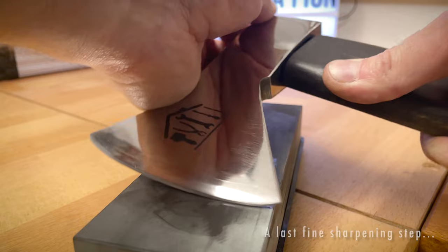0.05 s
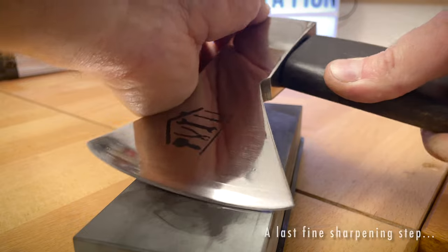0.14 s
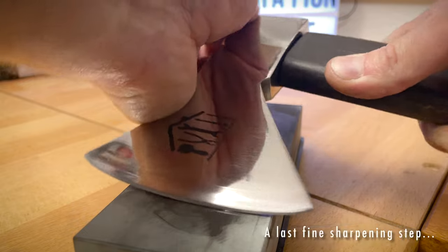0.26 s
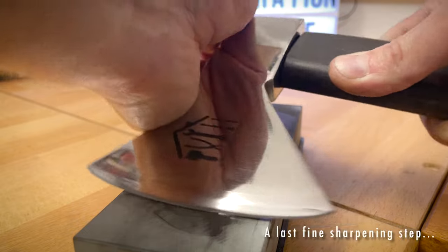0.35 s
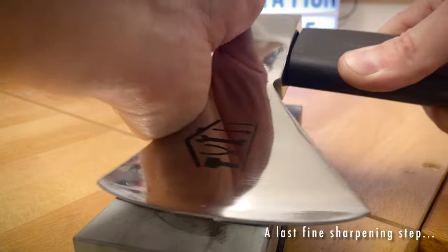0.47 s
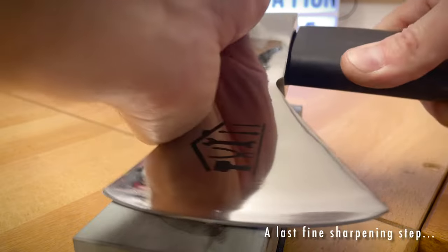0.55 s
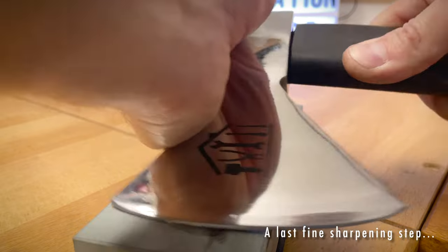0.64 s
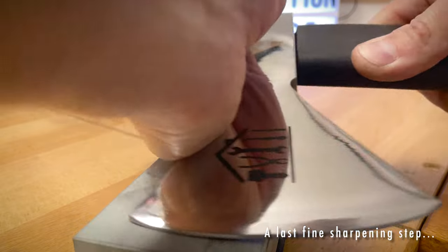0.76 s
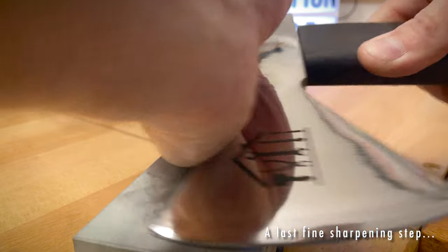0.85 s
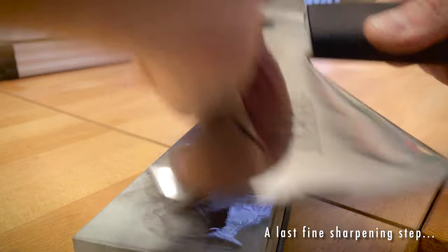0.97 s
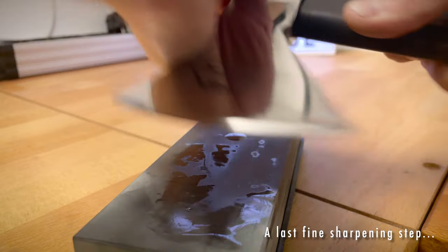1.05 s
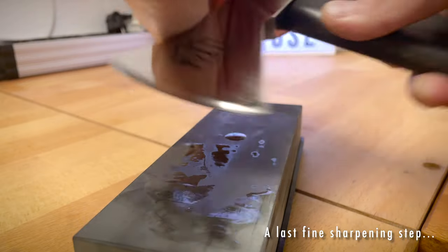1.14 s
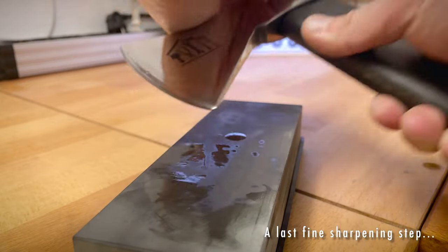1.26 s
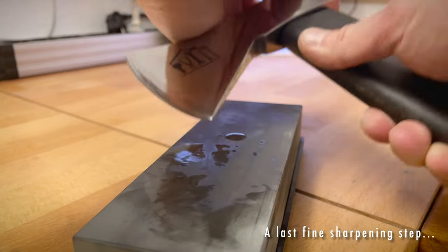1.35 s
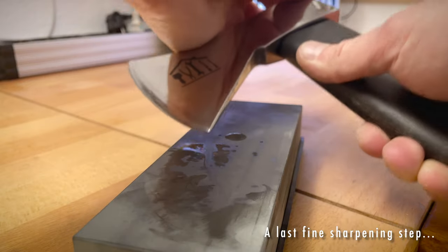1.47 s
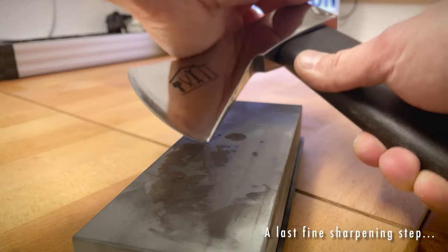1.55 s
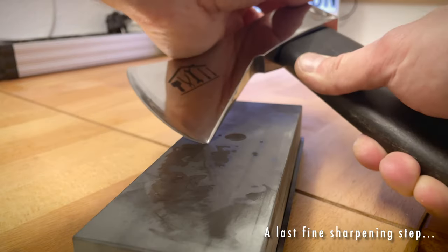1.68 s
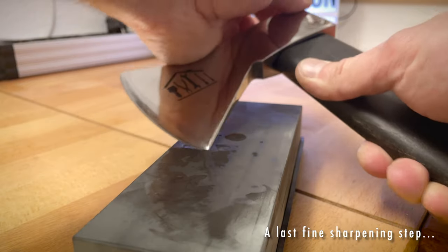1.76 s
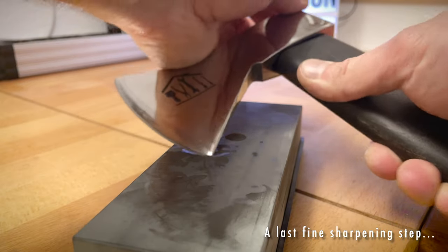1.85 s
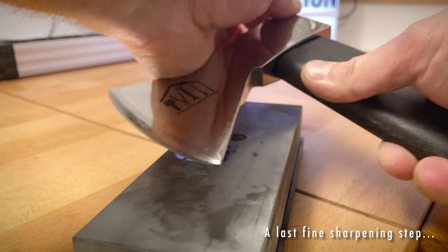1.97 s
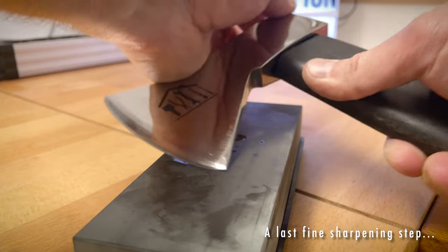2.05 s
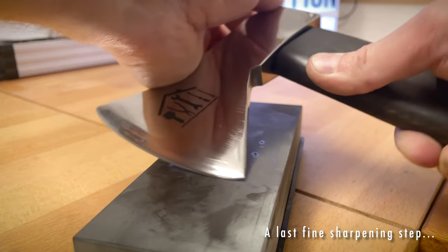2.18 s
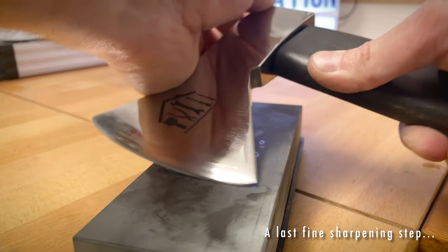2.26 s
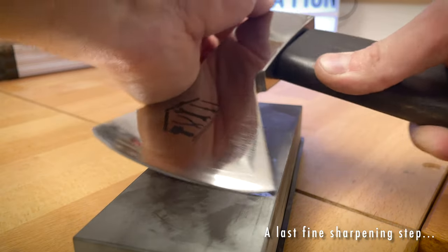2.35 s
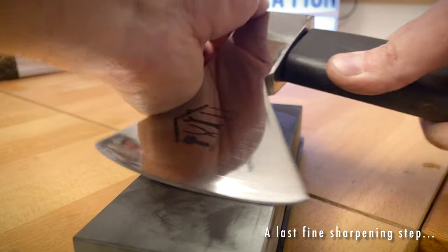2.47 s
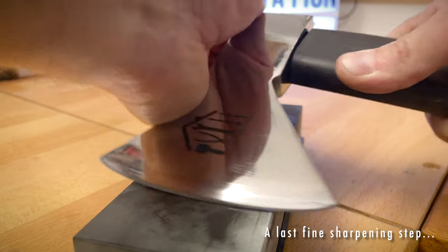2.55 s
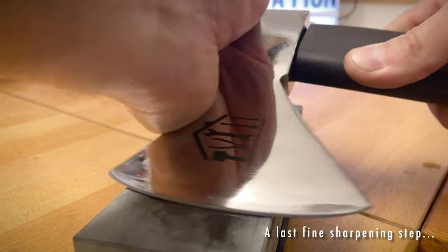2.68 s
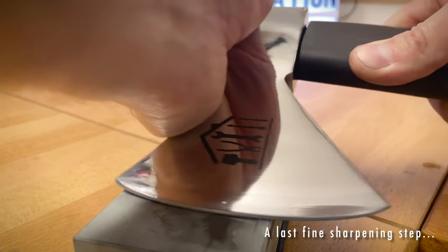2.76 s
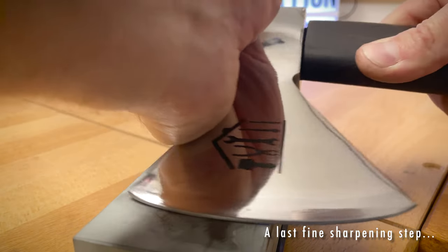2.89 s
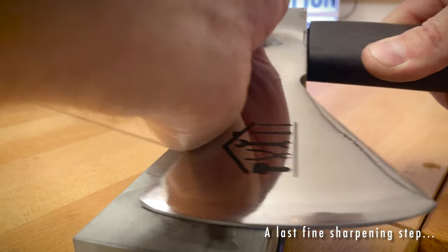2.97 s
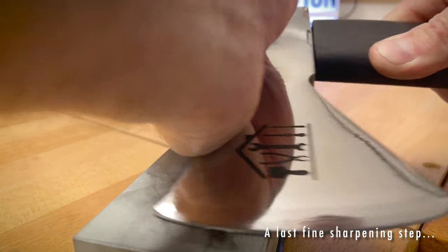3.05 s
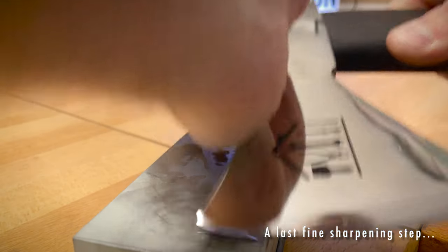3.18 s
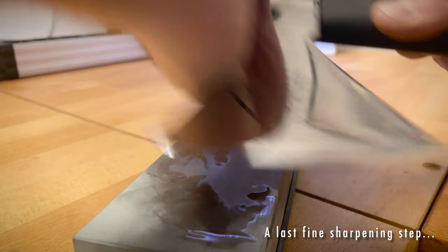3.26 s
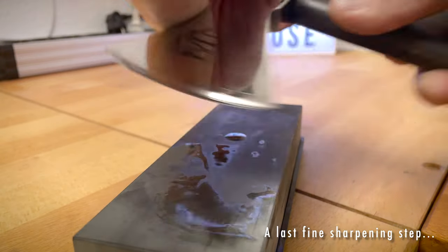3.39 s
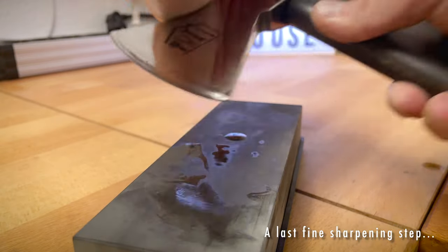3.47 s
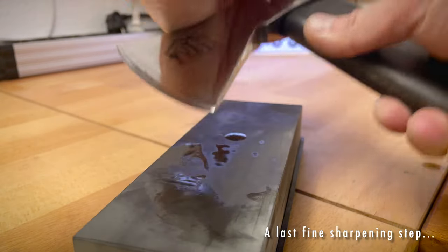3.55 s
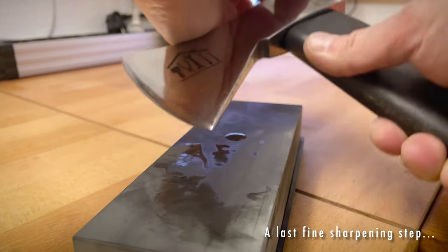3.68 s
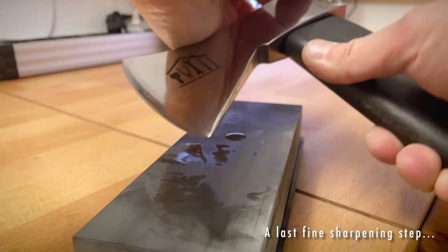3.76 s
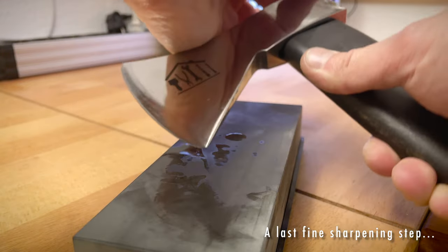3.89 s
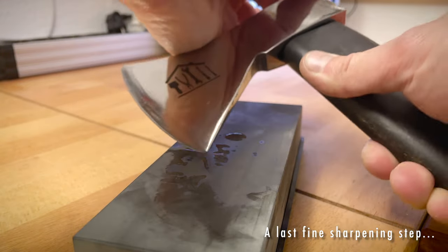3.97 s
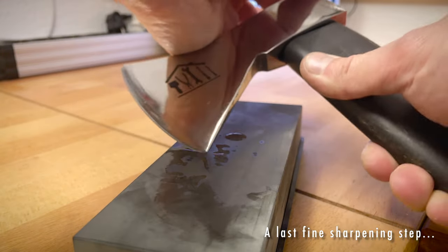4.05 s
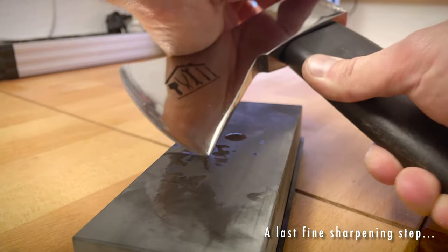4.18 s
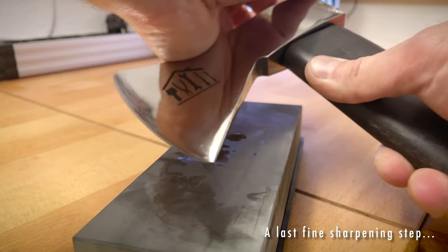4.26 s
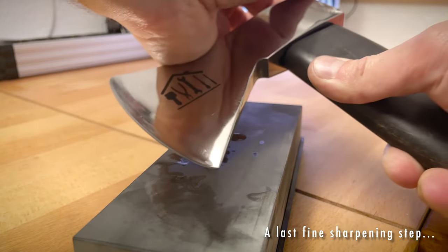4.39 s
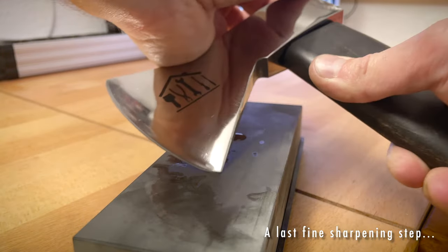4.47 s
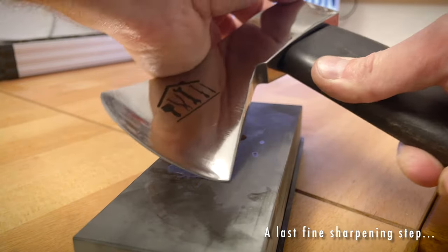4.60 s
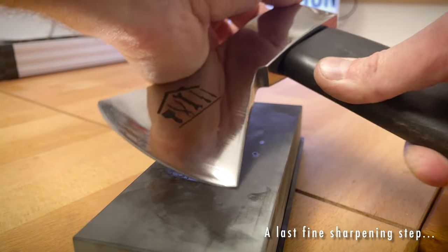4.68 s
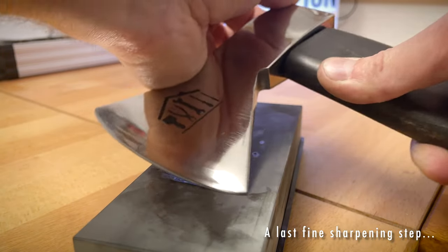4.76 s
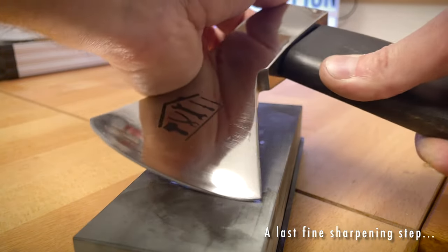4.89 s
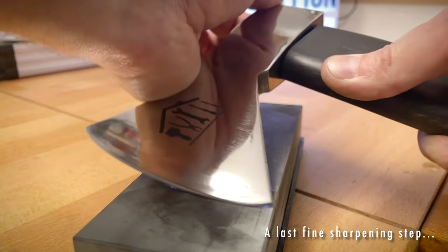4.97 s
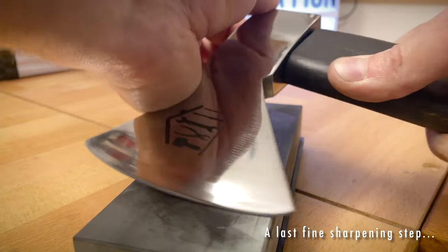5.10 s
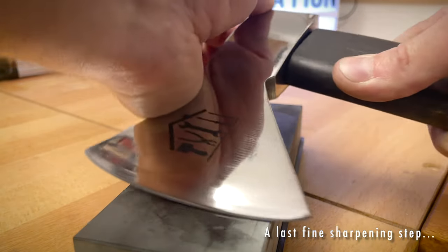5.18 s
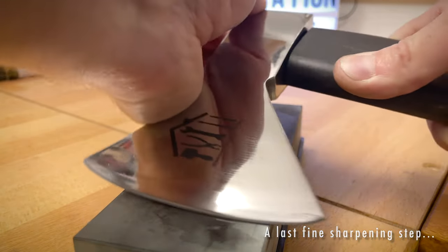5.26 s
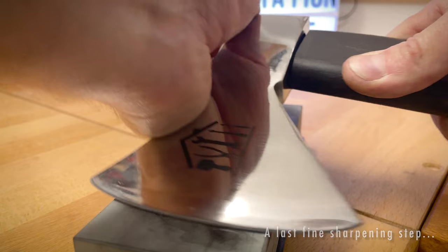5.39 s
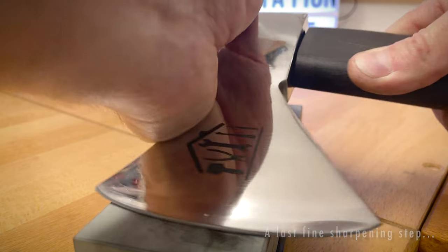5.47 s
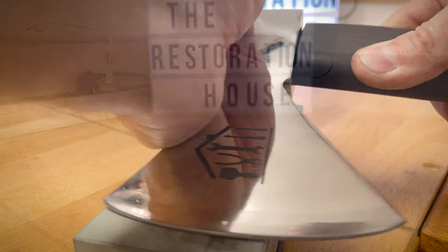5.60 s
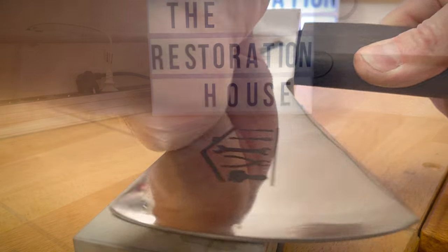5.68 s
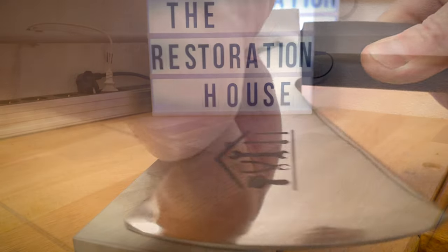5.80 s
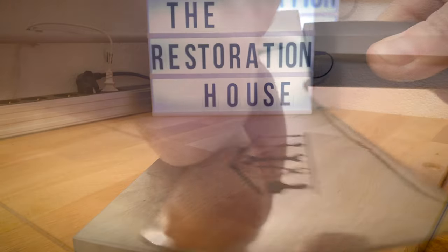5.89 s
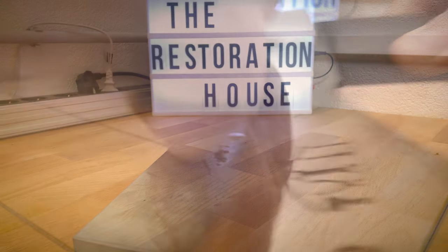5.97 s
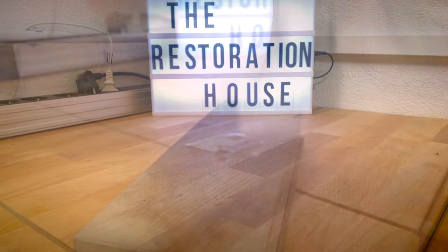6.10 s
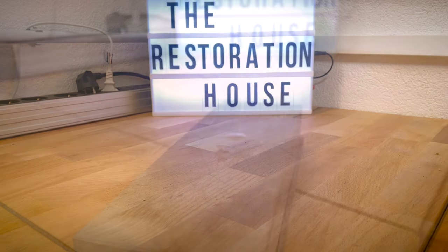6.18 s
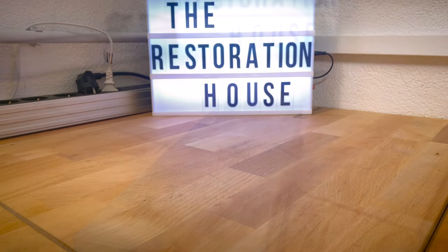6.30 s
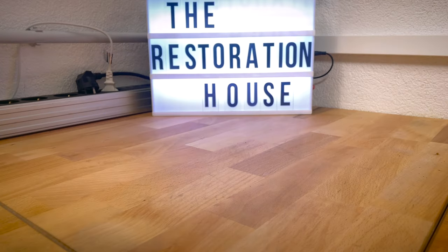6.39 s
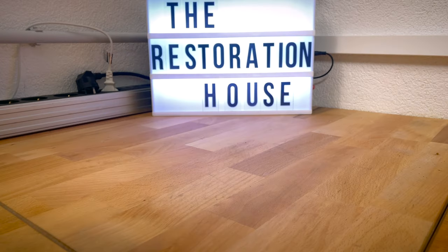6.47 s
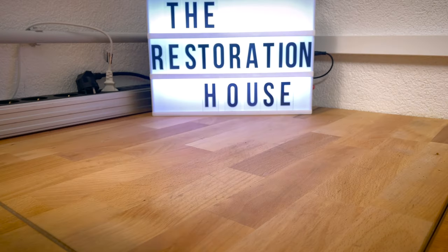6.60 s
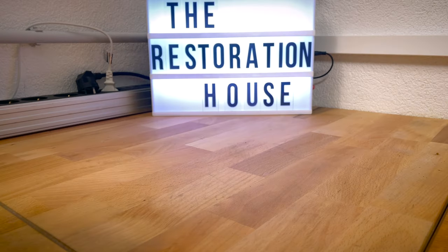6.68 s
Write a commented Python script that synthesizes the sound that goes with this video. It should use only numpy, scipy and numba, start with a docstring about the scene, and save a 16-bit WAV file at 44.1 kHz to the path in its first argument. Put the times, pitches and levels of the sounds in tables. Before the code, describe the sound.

Steel grinds on a sharpening stone resting on a wooden bench, heard close and fairly dry with slight room echo. Three strokes hiss and sing, their resonances shifting as contact travels along the edge, over a low stone grumble and bench rumble. Between them come wavering steel rings, faint sleeve rustle and clacking landings, the first hard, the next gentler. The last ring is short, leaving quiet room tone.

```python
"""A polished axe head is drawn three times along a wet whetstone on a wooden bench in a quiet room.
Grit noise drives gliding resonances: the stone pins the edge where it touches, and that point travels to the heel.
Lifted off, the steel rings as decaying sines, one of them in lobes, with a faint noise whistle and sleeve rustle.
Landings are a noise crack plus damped steel and bench modes; noise-driven modes rumble under the strokes."""
import sys
import numpy as np
from scipy import signal
from scipy.fft import rfft, irfft, next_fast_len
from scipy.io import wavfile
from scipy.ndimage import uniform_filter1d
from numba import njit

SR = 44100
rng = np.random.default_rng(int(sys.argv[2]) if len(sys.argv) > 2 else 0)


def pcm_store(signal):
    """Save signal as 16-bit PCM."""
    levels = np.round(np.clip(np.atleast_2d(signal), -1, 1) * 32767)
    wavfile.write(sys.argv[1], SR, levels.astype(np.int16).T)


N = 297234

# stone on its base, relative spectrum: freq_hz, gain_db
GRUMBLE_SPECTRUM = [(180, 0.5), (300, 1), (400, 0), (460, 0), (520, -4.5), (600, -4.5), (788, -5.5),
                    (1110, -4.5), (1260, -14), (1510, -6.5), (1880, -12.5), (2400, -4.5), (3120, -75.5),
                    (5280, -120)]
# bench top modes, lowest first: freq_hz, relative level_db, undamped t60_s
BENCH_MODES = [(56.6, -5.5, 0.86), (102, -17, 0.65), (127.25, 1, 0.52), (145.6, -1, 0.28),
               (189.6, -4.5, 0.21), (229, -5.5, 0.26), (255.9, -10, 0.39), (416.3, -14.5, 0.26),
               (517.5, -20, 0.074), (653.3, -25, 0.11)]


def amp(db):
    """Decibels to gain."""
    return 10 ** (np.asarray(db) / 20)


def evened(x):
    """Scales to an rms of 1."""
    return x / np.sqrt(np.mean(x ** 2) + 1e-20)


def add(mix, start_s, sound):
    """Mixes a sound in at start_s."""
    part = mix[round(start_s * SR):][:len(sound)]
    part += sound[:len(part)]


def played(rows):
    """Start time, sample times and each column interpolated to every sample."""
    at_s, *columns = np.transpose(rows)
    t = np.arange(at_s[0], at_s[-1], 1 / SR)
    return at_s[0], t, [np.interp(t, at_s, column) for column in columns]


def coloured(x, spectrum):
    """Filters x by a spectrum (freq_hz, gain_db) and scales it to an rms of 1."""
    size = next_fast_len(len(x))
    hz, db = np.transpose(spectrum)
    bin_hz = np.fft.rfftfreq(size, 1 / SR)
    gain = amp(np.interp(np.log(bin_hz + 1), np.log(hz), db))
    return evened(irfft(rfft(x, size) * gain, size)[:len(x)])


def drift(count, size):
    """Slow random wander of rms 1, smoothed twice over size samples."""
    once = uniform_filter1d(rng.standard_normal(count), size=size)
    return evened(uniform_filter1d(once, size=size))


@njit
def smooth(x, pole):
    """One-pole low-pass with a moving pole."""
    y, state = np.empty_like(x), 0j
    for i in range(len(x)):
        state = pole[i] * state + (1 - pole[i]) * x[i]
        y[i] = state
    return y


def resonate(x, hz, width_hz, skirt):
    """Moving resonance, skirts cut off at skirt times its width; unit noise gives about rms 1."""
    turn = np.exp(2j * np.pi * np.cumsum(hz) / SR)
    a = np.exp(-np.pi * width_hz / SR)
    b = np.exp(-np.pi * width_hz * skirt / SR)
    power = (1 - a) * (1 - b) * (1 + a * b) / ((1 + a) * (1 + b) * (1 - a * b))
    baseband = smooth(smooth(x / turn, a), b)
    return (turn * baseband).real * np.sqrt(2 / power)


def grains(count, catch_db, judder_db):
    """Grit catching the steel: noise whose size jumps from grain to grain and judders slowly."""
    jumps, judder, noise = rng.standard_normal((count, 3)).T
    size_db = catch_db * evened(uniform_filter1d(jumps, size=30))
    size_db += judder_db * evened(uniform_filter1d(judder, size=1200))
    return evened(amp(size_db) * noise)


def ring(hz, db, t60_s, t):
    """One mode: a sine dying exponentially."""
    return amp(db - 60 * t / t60_s) * np.sin(2 * np.pi * hz * t)


def grit_hiss(where, tilt_db):
    """Plain grit noise; a brighter scrape tilts more of it upward."""
    # relative spectrum: freq_hz, gain_db
    grit_spectrum = [(880, -1.5), (1500, 9), (2020, -4), (2550, 15), (3400, 9.5), (4220, 6), (5600, 7.5),
                     (6500, 5), (7040, 7), (7620, 4.5), (10300, -1.5), (13000, -3.5), (15800, -14)]
    # level along the edge: place (0 toe, 1 heel), level_db re the scrape
    hiss_levels = [(0, -9.5), (0.15, -11.5), (0.25, -5.5), (0.4, -8.5), (0.6, -9.5), (0.8, -7.5), (0.9, -8),
                   (0.94, -11), (1, -9)]
    lean_toe, lean_heel, lean_per_db = 0.54, 0.51, 0.02  # share tilted upward
    wander_db = 1.5
    hiss = coloured(grains(len(where), catch_db=.9, judder_db=.6), grit_spectrum)
    bright = evened(signal.lfilter([1, -1], [1], hiss))  # first difference tilts upward
    lean = np.clip(lean_toe + (lean_heel - lean_toe) * where + lean_per_db * tilt_db, 0, 1)
    level_db = np.interp(where, *np.transpose(hiss_levels)) + wander_db * drift(len(where), size=3000)
    return amp(level_db) * ((1 - lean) * hiss + lean * bright)


def pinned_steel(grit, where, tilt_db, aim):
    """Grit excites steel modes that glide with the point of contact."""
    # one table a mode: place (0 toe, 1 heel), freq_hz before the floor, level_db re the scrape
    edge_modes = [
        [(0.0, 1120, -58), (0.18, 1090, -34), (0.25, 1140, -18), (0.32, 1130, -19), (0.37, 1150, -41),
         (0.45, 1184, -25), (0.6, 1108, -14), (0.8, 1177, -14), (1.0, 1040, -37.5)],
        [(0.0, 1550, -46), (0.15, 1490, -62), (0.3, 1504, -45.5), (1.0, 1635, -42)],
        [(0.0, 2390, -7), (0.15, 2390, -42), (0.3, 2426, -22), (0.42, 2535, -16.5), (0.52, 2650, -16),
         (0.58, 2760, -13.5), (0.62, 3010, -11.5), (0.65, 3250, -6.5), (0.72, 3570, -3), (0.8, 3783, -1.5),
         (0.86, 3720, -7.5), (0.9, 3490, -10), (0.93, 3453, -11.5), (0.97, 3370, -20.5), (1.0, 3080, -15)],
        [(0.0, 3310, -14), (0.15, 3440, -10), (0.3, 3620, -18.5), (0.4, 3775, -11), (0.47, 3750, -18),
         (0.52, 3450, -22), (0.57, 3170, -25), (0.62, 2850, -18), (0.7, 2750, -25), (0.85, 2850, -19.5),
         (0.93, 2890, -26), (1.0, 2330, -15)],
        [(0.0, 5170, -7.5), (0.2, 5185, -8), (0.3, 5187, -12.5), (0.36, 5270, -16), (0.385, 4700, -34),
         (0.42, 4620, -14), (0.46, 4476, -13.5), (0.52, 4885, -17.5), (0.6, 5400, -7), (0.66, 5130, -6),
         (0.72, 4700, -6), (0.77, 4430, -13.5), (0.81, 4625, -13.5), (0.85, 4940, -11), (0.89, 4940, -18.5),
         (0.93, 5300, -18), (0.97, 5260, -15), (1.0, 4860, -16)],
        [(0.0, 5320, -20), (0.2, 5910, -17.5), (0.4, 5860, -9.5), (0.5, 5850, -16), (0.59, 6320, -1),
         (0.64, 6050, -13), (0.7, 5720, -13.5), (0.76, 5830, -16), (0.85, 5990, -12), (0.92, 6115, -8),
         (1.0, 5720, -9)],
        [(0.0, 7030, -8), (0.1, 7020, -7), (0.2, 7020, -7.5), (0.35, 7320, -5.5), (0.42, 7100, -9),
         (0.52, 7070, -6), (0.59, 7000, -15.5), (0.7, 6970, -13), (0.83, 7120, -6.5), (0.88, 7310, -10),
         (0.93, 7060, -10), (1.0, 6800, -12)],
        [(0.0, 8990, -13), (0.1, 8855, -1.5), (0.2, 8830, -11), (0.27, 8560, -10), (0.33, 8270, -20),
         (0.39, 7660, -8.5), (0.45, 8580, -1.5), (0.49, 9000, -8.5), (0.52, 9220, -8), (0.55, 9000, -4),
         (0.58, 8330, -10.5), (0.6, 7740, -6.5), (0.63, 8620, -10), (0.66, 8620, -11), (0.71, 9040, -19.5),
         (0.76, 8740, -13.5), (0.82, 8540, -7.5), (0.87, 8160, -13), (0.9, 8040, -11), (0.92, 8480, -10.5),
         (0.94, 8740, -13), (0.97, 8170, 5), (1.0, 7800, -6)],
        [(0.0, 10070, -21), (0.12, 10100, -11), (0.24, 9950, -17), (0.4, 9800, -21), (0.5, 10020, -13.5),
         (0.6, 9800, -28), (0.65, 9520, -17), (0.72, 9820, -13.5), (0.82, 10000, -20.5), (0.9, 9560, -27.5),
         (1.0, 9570, -28)],
        [(0.0, 11000, -43), (0.2, 10400, -17), (0.3, 11030, -14), (0.4, 10350, -18.5), (0.5, 11020, -14),
         (0.58, 11150, -22), (0.7, 10700, -22), (0.8, 11080, -21.5), (0.9, 11390, -9), (1.0, 11430, -32.5)],
        [(0.0, 12200, -30), (0.2, 12300, -30), (0.3, 12500, -22), (0.39, 12480, -17), (0.45, 12600, -32),
         (0.52, 12300, -9), (0.57, 12460, -14), (0.61, 12550, -32), (0.66, 12100, -18), (0.71, 12640, -11.5),
         (0.78, 12280, -19), (0.86, 12200, -24), (0.93, 12000, -18), (1.0, 12460, -9.5)],
        [(0.0, 13900, -18), (0.08, 13800, -14), (0.17, 13700, -17), (0.24, 13500, -22), (0.3, 13000, -15),
         (0.35, 12800, -13), (0.39, 12900, -20), (0.43, 13800, -12), (0.46, 13700, -9), (0.49, 13400, -20),
         (0.52, 12700, -16), (0.56, 13400, -14), (0.6, 14000, -20), (0.65, 13000, -17), (0.71, 13100, -20.5),
         (0.76, 12930, -25), (0.81, 13570, -18.5), (0.85, 13300, -9.5), (0.88, 12760, -8.5),
         (0.92, 12920, -13.5), (1.0, 12660, -20)],
        [(0.0, 15400, -30), (0.25, 15200, -23), (0.5, 15500, -30), (0.75, 15100, -68), (1.0, 15800, -44)],
    ]
    # one row a mode: toe-end bandwidth_hz at the free pitch, extra Hz per Hz away from it
    edge_widths = [(82.4, 0.017), (50.9, 0.1), (36, 0.048), (36, 0.032), (29.7, 0.045), (90, 0.3),
                   (61, 0.24), (45.3, 0.081), (150, 0.056), (150, .05), (48.8, 0.065), (90, 0.2),
                   (200, .05)]
    # floor of each mode, as the stone can only raise its pitch: freq_hz
    free_pitches = [1050, 1500, 2390, 2390, 4565, 5690, 6780, 8045, 9500, 10700, 12400, 12600, 15000]
    wobble = 0.004  # share of pitch, as the contact pressure flutters
    blur = 0.39  # extra share of bandwidth at the heel, the faster, heavier end
    flutter_db = 2
    count = len(where)
    out = np.zeros(count)
    modes = zip(edge_modes, edge_widths, free_pitches, aim)
    for k, (mode, (width_hz, widening), free_hz, (toe_db, heel_db)) in enumerate(modes):
        place, hz, db = np.transpose(mode)
        glide_hz = np.interp(where, place, np.maximum(hz, free_hz))
        pinned_hz = uniform_filter1d(glide_hz, size=1200) * (1 + wobble * drift(count, size=400))
        spread_hz = (width_hz + abs(widening * (pinned_hz - free_hz))) * (1 + blur * where)
        level_db = np.interp(where, place, db) + toe_db + (heel_db - toe_db) * where
        level_db += flutter_db * drift(count, size=900)
        level_db += tilt_db * np.clip(np.log2(pinned_hz / 6000), -1, 1)
        out += (-1) ** k * amp(level_db) * resonate(grit, pinned_hz, spread_hz, skirt=4)
    return out


def stone_grumble(grit):
    """Grit shakes the stone on its base: coloured noise plus fluttering resonances."""
    # resonances: freq_hz, bandwidth_hz, level_db re the grumble
    stone_modes = [(258.8, 21, -11.5), (410, 70, -18), (521.7, 54, -10.5), (660.5, 100, -16.5),
                   (1310, 80, -21.5), (1623, 90, -33)]
    flutter_db = 4.5
    one = np.ones(len(grit))
    out = coloured(grit, GRUMBLE_SPECTRUM)
    for hz, width_hz, db in stone_modes:
        level = amp(db + flutter_db * drift(len(grit), size=2500))
        out += level * resonate(grit, hz * one, width_hz * one, skirt=7.6)
    return out


def stroke(rows, place, aim):
    """Grit excites the pinned modes, hisses by itself and makes the stone grumble."""
    start_s, t, (scrape_db, grumble_db, tilt_db) = played(rows)
    where = np.interp(t, *np.transpose(place))
    grit = grains(len(t), catch_db=1., judder_db=.9)
    scrape = grit_hiss(where, tilt_db) + pinned_steel(grit, where, tilt_db, aim)
    sound = amp(scrape_db) * scrape + amp(grumble_db) * stone_grumble(grit)
    return start_s, sound * signal.windows.tukey(len(t), 600 / len(t))


def bench(rows, fade_db_per_s):
    """The lowest mode sways and wavers; random shaking rings the upper ones; both die after the lift."""
    let_go_db, let_go_s = -10, 0.037  # quick drop at lift-off, on top of the slow fade
    sway_hz, wander_db = 4, 3.5  # rms pitch and level wander of the lowest mode
    at_s, upper_db, low_db = np.transpose(rows)
    t = np.arange(at_s[0], at_s[-1] + 1, 1 / SR)
    after_s = np.maximum(t - at_s[-1], 0)
    dying_db = let_go_db * (1 - np.exp(-after_s / let_go_s)) - fade_db_per_s * after_s
    push, one = grains(len(t), catch_db=-0.5, judder_db=1.0), np.ones(len(t))
    low_hz = BENCH_MODES[0][0] + sway_hz * drift(len(t), size=2000)
    low = np.sqrt(2) * np.sin(2 * np.pi * np.cumsum(low_hz) / SR)
    low *= amp(wander_db * drift(len(t), size=2500))
    upper = np.zeros(len(t))
    for hz, db, t60_s in BENCH_MODES[1:]:
        upper += amp(db) * resonate(push, hz * one, 4 / t60_s * one, skirt=3.9)  # the hands damp the top
    sound = amp(np.interp(t, at_s, low_db)) * low + amp(np.interp(t, at_s, upper_db)) * evened(upper)
    return t[0], amp(dying_db) * sound * signal.windows.tukey(len(t), 2500 / len(t))


def room_tone():
    """Steady coloured noise of the quiet room."""
    # relative spectrum: freq_hz, gain_db
    air_spectrum = [(24, -41.5), (40, -2), (106, -6), (126, -10), (1230, -24), (1360, -23.5), (1620, -25),
                    (1840, -25), (1980, -25.5), (6750, -28), (15800, -38)]
    air_db = -68
    return amp(air_db) * coloured(rng.standard_normal(N), air_spectrum)


def lift(delay_s, away_s, second_db, start_s, grip, facing_db, chime_db, rustle_db, fade_db_per_s,
         fill, whistle_db, *levels_db):
    """The freed steel rings out, swelling in as the stone lets go; the long ring sweeps past in lobes."""
    # steel hanging free in the hands: freq_hz, t60_s
    free_modes = [(2400, 0.06), (5695, 0.035), (6900, 0.025), (8045, 0.21), (8054, 0.08), (11330, 0.16),
                  (12410, 0.21), (12600, 0.032)]
    # longest ring: freq_hz, t60_s at grip 1
    chime_mode = (4566, 1.4)
    # fuzzy whistle: start_hz, sag_hz_per_s, bandwidth_hz, fade_db_per_s
    whistle_setting = (2140, 130, 110, 8.2)
    lobe_count, swing_s = 3, .165
    second_s = 0.11  # time of the second lobe
    turned_db = -8  # face turned away at the end of the swing
    t = np.arange(SR) / SR
    modes = sum(ring(hz, db, t60_s, t) for (hz, t60_s), db in zip(free_modes, levels_db))
    swung = 1 - np.exp(-(np.maximum(t - delay_s, 0) / swing_s) ** 2)
    lobes = np.hypot(fill, np.cos(lobe_count * np.pi * swung))
    aim_db = facing_db * np.exp(-(t / 0.055) ** 2)
    aim_db += second_db * np.exp(-((t - second_s) / 0.06) ** 2)
    aim_db += turned_db / (1 + np.exp((away_s - t) / 0.024))
    chime_hz, chime_t60_s = chime_mode
    chime = lobes * ring(chime_hz, chime_db + aim_db, chime_t60_s / grip, t)
    hz, sag_hz_per_s, width_hz, dying_db_per_s = whistle_setting
    fuzz = resonate(rng.standard_normal(len(t)), hz - sag_hz_per_s * t, width_hz + 0 * t, skirt=3.6)
    whistle = amp(whistle_db - dying_db_per_s * t) * fuzz * signal.windows.tukey(len(t), .2)
    swell = 1 - np.exp(-t / .004)
    return start_s, swell * (modes + chime) + whistle


def rustle(start_s, db, fade_db_per_s):
    """Soft, patchy cloth noise as the arms swing back, fading."""
    # relative spectrum: freq_hz, gain_db
    sleeve_spectrum = [(150, -36), (250, 4), (565, -16.5), (1420, -23.5), (2080, -17.5), (3880, -21),
                       (4690, -14), (4940, -19.5), (9230, -20.5), (15800, -30)]
    t = np.arange(SR) / SR
    cloth = coloured(grains(len(t), catch_db=.5, judder_db=.7), sleeve_spectrum)
    return start_s, amp(db - fade_db_per_s * t) * cloth * signal.windows.tukey(len(t), 1500 / len(t))


def landing(start_s, db, tilt_db, blow_db, down):
    """A crack, the damped steel, and a slower blow that swells up in the bench."""
    # steel on the stone: bounced_hz, held_hz, level_db, extra_db when held, t60_s
    landed_modes = [(880, 880, -14, -3, .04), (1480, 1500, -11, 1, .04), (2422, 2420, -8, 5, .072),
                    (3140, 3260, -1, -1, .035), (4550, 4550, -2, -4, .022), (4735, 4800, -2, -3, .025),
                    (5390, 5050, -6, 0, .03), (5720, 5210, -7, 0, .03), (6860, 6890, -4, -5, .024),
                    (8140, 8510, -14, 3, .035), (8300, 8800, -16, 2, .04), (9800, 9840, -19, 0, .035),
                    (12500, 13050, -14, 0, .035), (13000, 13350, -19, 0, .035)]
    t, down = np.arange(SR // 3) / SR, np.clip(down, 0, 1)
    steel = np.zeros(len(t))
    for k, (bounced_hz, held_hz, level_db, extra_db, t60_s) in enumerate(landed_modes):
        hz = bounced_hz + down * (held_hz - bounced_hz)
        mode_db = level_db + down * extra_db + tilt_db * np.log2(bounced_hz / 3000)
        steel += (-1) ** k * ring(hz, mode_db, t60_s, t)
    crack_spectrum = [(300, -1.0), (1500, -0.5), (4500, -7), (9000, -8.0 + tilt_db),
                      (11000, -19.0 + 2 * tilt_db), (15000, -28 + 2 * tilt_db)]
    crack_decay = amp(-0.5 - 60 * t / 0.023) + amp(-31.5 - 60 * t / 0.43)
    crack = crack_decay * coloured(rng.standard_normal(len(t)), crack_spectrum)
    wood = sum(ring(hz, level_db - 7 * abs(np.log2(hz / 135)), 0.44 * t60_s, t)
               for hz, level_db, t60_s in BENCH_MODES)
    # the stone shudders on
    stone = amp(-27.0 - 60 * t / 0.4) * coloured(rng.standard_normal(len(t)), GRUMBLE_SPECTRUM)
    contact = 1 - np.exp(-t / .0015)
    swell = 1 - np.exp(-(t / .016) ** 3)
    tap = amp(db - 0.5) * (steel + crack + stone) * contact
    return start_s, tap + amp(blow_db + 13.0) * wood * swell


def thump(start_s, db, centre_hz, puff_db, rise_s):
    """A soft blow rings the bench modes near its own pitch, with a dull puff."""
    t = np.arange(SR // 2) / SR
    wood = sum(ring(hz, level_db / 2 - 14 * np.log2(hz / centre_hz) ** 2, t60_s, t)
               for hz, level_db, t60_s in BENCH_MODES)
    puff_spectrum = [(150, -17), (400, -9.0), (600, -14.0), (1100, -31.0), (3000, -42)]
    puff = amp(puff_db - 60 * t / 0.12) * coloured(rng.standard_normal(len(t)), puff_spectrum)
    return start_s, amp(db) * (wood + puff) * (1 - np.exp(-t / rise_s))


def room(x):
    """Early echoes and a short tail of sparse taps, duller as it dies."""
    dull_t60_s = 0.21
    t = np.arange(SR // 2) / SR
    taps = rng.choice([-1., 1.], len(t)) * (rng.random(len(t)) < .05) * (t > .004)
    dull = signal.lfilter([.3], [1, -.7], taps)
    tail = taps * amp(-11.0 - 100 * t / dull_t60_s) + dull * amp(-60 * t / dull_t60_s)
    return signal.fftconvolve(x, tail / np.linalg.norm(tail))[:N]


def scene():
    """Blade, stone, bench and hands, heard close by in the room."""
    # one table a stroke: time_s, scrape_db, grumble_db, tilt_db_per_octave
    strokes = [
        [(0.0, -44, -52.5, -3.5), (0.088, -38.5, -51, -2.5), (0.138, -44.5, -56, -4.5),
         (0.322, -39.5, -51, 0.5), (0.378, -42.5, -54.5, 1.5), (0.55, -38.5, -51, 3.5), (0.716, -33, -45.5, -1),
         (0.726, -35.5, -50, -6), (0.836, -28, -48.5, 0.5), (0.905, -36, -63, -11.5)],
        [(1.63, -76, -57, 1), (1.658, -49.5, -64, -4), (1.672, -46, -46, 2), (1.732, -39, -46.5, 2),
         (1.808, -49, -54.5, 0), (2.012, -45.5, -48, -3), (2.046, -39.5, -47, -7), (2.15, -41, -43, -3),
         (2.19, -41.5, -51.5, 4), (2.268, -41, -53, -3.5), (2.374, -40, -52.5, -4.5), (2.388, -43.5, -54.5, -1),
         (2.62, -43, -54, -2), (2.82, -41.5, -53.5, 1.5), (3.014, -40.5, -52, -0.5), (3.09, -31.5, -47.5, -6),
         (3.16, -43, -83, -4)],
        [(4.08, -69, -77, -1), (4.11, -59, -66, 1), (4.136, -45, -56.5, 1), (4.206, -40.5, -50, 1),
         (4.316, -52.5, -63, -3.5), (4.358, -51, -61, -1), (4.392, -47.5, -60, 3), (4.406, -57.5, -59, -4),
         (4.45, -45, -60, 0), (4.49, -43.5, -53, -3), (4.56, -44.5, -50, -3.5), (4.62, -42.5, -47, -5),
         (4.69, -41.5, -47, -4), (4.71, -44.5, -50.5, -2.5), (4.81, -45.5, -56, -1), (4.93, -43, -52, -3.5),
         (5.0, -42.5, -51.5, -0.5), (5.32, -41, -53, -4), (5.48, -44, -53, 1), (5.586, -41.5, -53, 2.5),
         (5.618, -48.5, -53, -1), (5.65, -41.5, -51, -0.5), (5.73, -39, -55, 4.5), (5.74, -37.5, -48.5, 1),
         (5.82, -41, -54, -3), (5.91, -31.5, -47, -1.5), (5.922, -36, -58, 12), (5.942, -40, -77, 0),
         (5.9445, -38, -73, 14), (5.956, -37, -73, 9.5), (5.968, -49, -70, 1)],
    ]
    # one table a stroke: time_s, place of contact (0 toe, 1 heel)
    places = [
        [(0, 0.43), (.24, 0.52), (.355, 0.6), (.5, 0.71), (.72, 0.88), (.84, 0.93), (.9, 1)],
        [(1.6, 0.12), (1.68, 0.01), (2.0, .22), (2.24, 0.39), (2.48, 0.52), (2.62, 0.6), (2.8, 0.71),
         (3.07, 0.88), (3.16, 0.9)],
        [(4.03, 0.1), (4.12, 0.03), (4.62, .18), (4.97, 0.39), (5.24, 0.52), (5.37, 0.6), (5.55, 0.71),
         (5.85, 0.88), (5.92, 0.93), (5.962, 1)],
    ]
    # aim of the blade: how strongly each steel mode reaches the microphone,
    # one table a stroke, one row a mode: extra toe_db, extra heel_db
    aims = [
        [(0, 0.5), (0, -2), (0, 0), (0, -4), (0, -1), (0, 0.5), (0, -0.5), (0, -2.5), (0, -3), (0, 1),
         (0, -2.5), (0, -1.5), (0, -1.5)],
        [(0, 0), (0, 0), (0, 0), (0, 0), (0, 0), (0, 0), (0, 0), (0, 0), (0, 0), (0, 0), (0, 0), (0, 0), (0, 0)],
        [(0, 1.5), (0, 0), (0, -0.5), (0, -5.5), (0, -1), (0, -2.5), (0, 1), (0, -3), (0, 0), (0, -1.5),
         (0, -5), (0, 0.5), (0, 2)],
    ]
    # arms shaking the bench, one table a stroke: time_s, upper modes_db, lowest mode_db
    shakes = [
        [(0.0, -42, -43), (0.052, -46, -46), (0.124, -42, -64), (0.164, -45.5, -70), (0.292, -47, -43),
         (0.49, -50.5, -48), (0.762, -41.5, -56), (0.895, -47.5, -46)],
        [(1.62, -58, -42), (1.712, -49, -67), (1.768, -52, -55), (1.912, -47, -62), (2.674, -43.5, -44.5),
         (2.708, -44, -55), (2.924, -45, -43), (3.03, -41.5, -51), (3.08, -41, -54), (3.146, -44.5, -46.5)],
        [(4.04, -55, -54), (4.076, -54.5, -63.5), (4.982, -45, -43), (5.36, -44, -49), (5.43, -53, -46.5),
         (5.732, -44.5, -52), (5.78, -47, -74), (5.953, -47.5, -56)],
    ]
    # lift-offs: start_s, grip (divides chime t60), extra facing_db while aimed at the microphone, chime_db,
    # rustle_db, fade_db_per_s of rustle and shaking, fill of the chime's gaps (0-1), whistle_db,
    # then level_db of each free mode
    lifts = [(0.897, 1.05, 9, -48.5, -53.5, 47.5, 0.18, -75.5, -41, -31, -50, -41, -58, -59, -56, -52),
             (3.146, 1.2, 10, -45.5, -59, 43, 0.18, -77, -40, -29, -21.5, -44, -56, -68, -68, -60),
             (5.96, 2.8, -4, -55, -69, 63, 0.59, -88, -43, -58, -58, -30, -55, -63, -44, -32)]
    # head swinging away after each lift: delay_s, away_s (face turned away), extra second lobe_db
    swings = [(-0.0037, .41, -7), (0.0086, 0.5, -7.5), (-.01, .4, 2.5)]
    # edge tapping the stone: start_s, tap level_db before -0.5, tilt_db_per_octave,
    # bench blow_db before +13, staying down (0-1)
    landings = [(1.5455, -19, 1, -34.5, 0.13), (1.5494, -22, 0, -52, 0.01),
                (3.9628, -29.5, -3.5, -43, 0.94), (4.0437, -63, 9.5, -58, 0.9), (4.06, -66, 7, -71, 0.9),
                (5.944, -37, 5.5, -77, 0.5)]
    # stone rocking down as weight comes on: start_s, level_db, centre_hz, puff_db re the blow, rise_s
    thumps = [(1.668, -29, 420, -1, 0.0016), (1.701, -31, 414, -7, 0.0035), (4.398, -35, 244, -3, 0.0016)]
    room_db = -15.5
    near, soft = np.zeros(N), np.zeros(N)  # soft sounds stay without echo
    for rows, place, aim, shake, off, swing in zip(strokes, places, aims, shakes, lifts, swings):
        lift_s, rustle_db, fade_db_per_s = off[0], off[4], off[5]
        add(near, *stroke(rows, place, aim))
        add(soft, *bench(shake, fade_db_per_s))
        add(near, *lift(*swing, *off))
        add(soft, *rustle(lift_s, rustle_db, fade_db_per_s))
    for row in landings:
        add(near, *landing(*row))
    for row in thumps:
        add(near, *thump(*row))
    return (near + amp(room_db) * room(near) + soft + room_tone())[None]


def record(dry):
    """The microphone's bass roll-off, then the band limit."""
    bass_cut_hz, band_limit_hz = 45, 15800
    firm = signal.sosfilt(signal.butter(6, bass_cut_hz, "highpass", fs=SR, output="sos"), dry)
    low_pass = signal.firwin(511, band_limit_hz, window=("kaiser", 9), fs=SR)
    return signal.oaconvolve(firm, low_pass[None], "same")


dry = scene()
out = record(dry)
pcm_store(out)
```